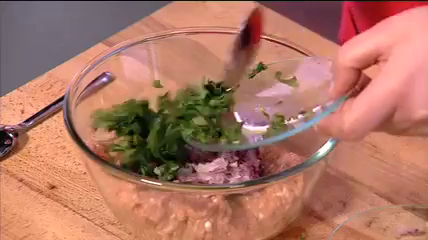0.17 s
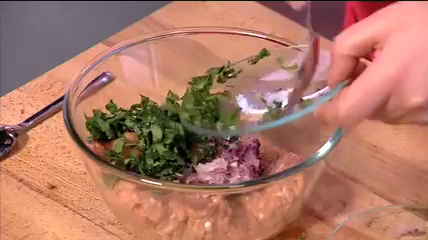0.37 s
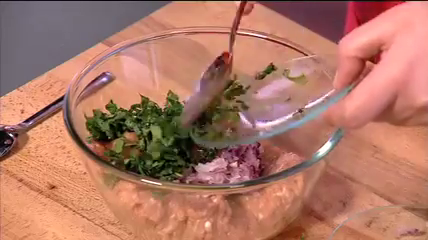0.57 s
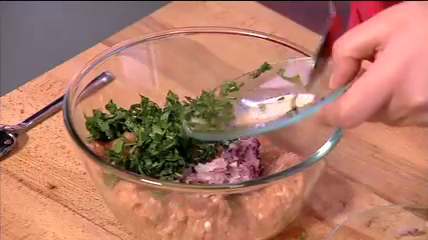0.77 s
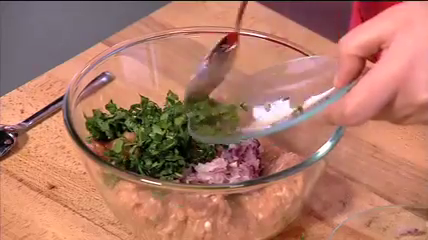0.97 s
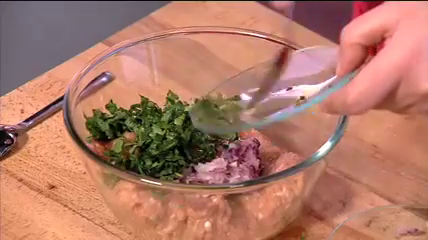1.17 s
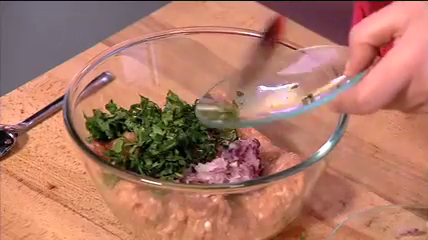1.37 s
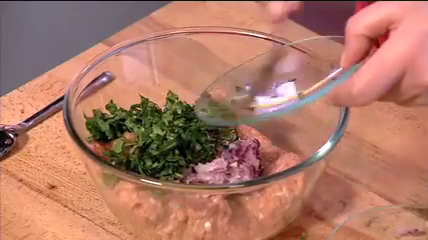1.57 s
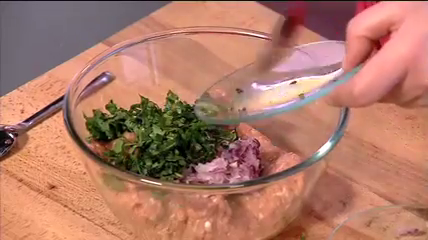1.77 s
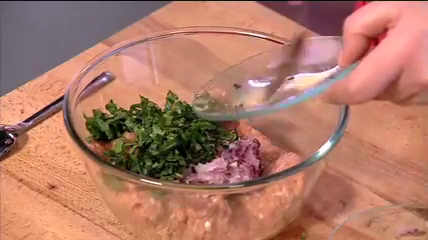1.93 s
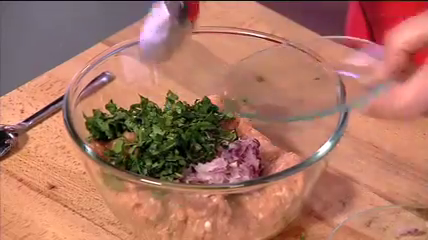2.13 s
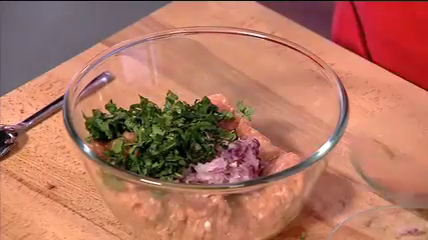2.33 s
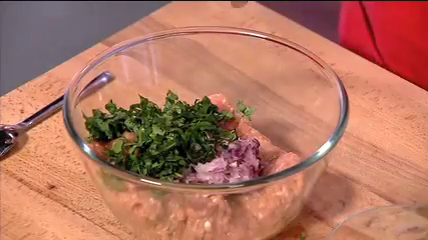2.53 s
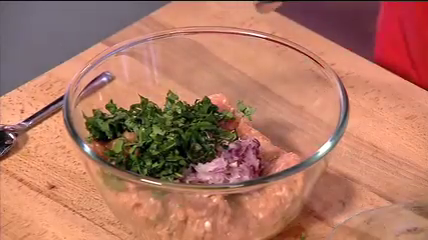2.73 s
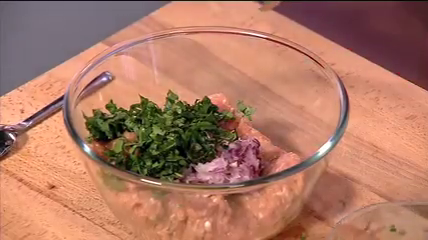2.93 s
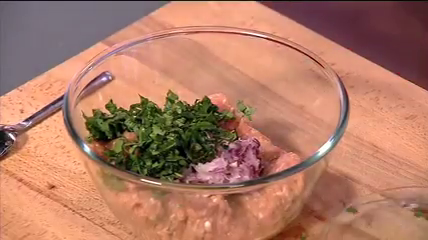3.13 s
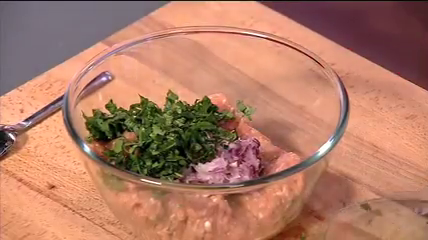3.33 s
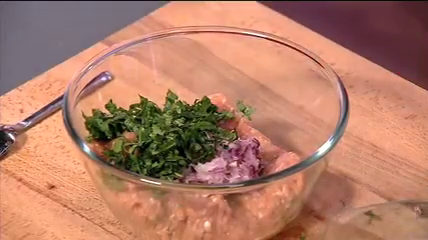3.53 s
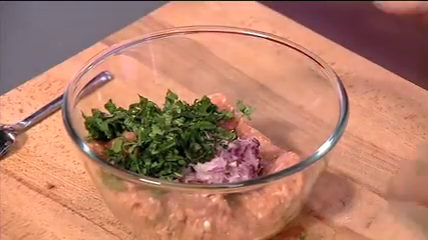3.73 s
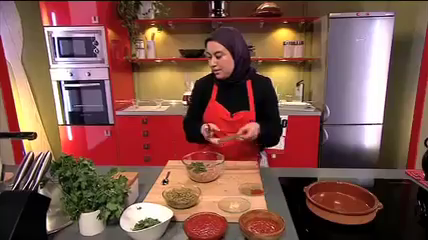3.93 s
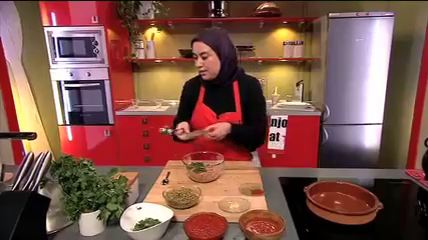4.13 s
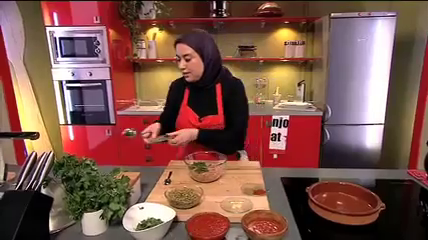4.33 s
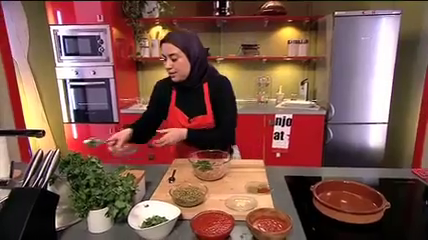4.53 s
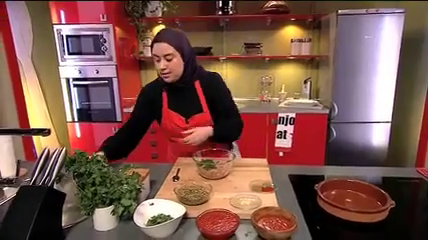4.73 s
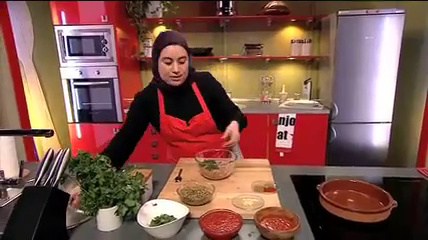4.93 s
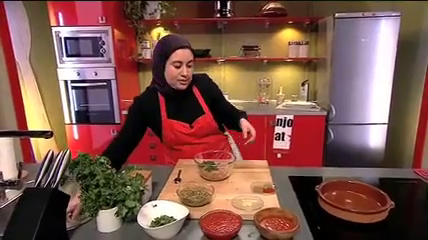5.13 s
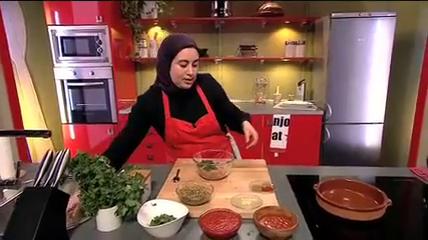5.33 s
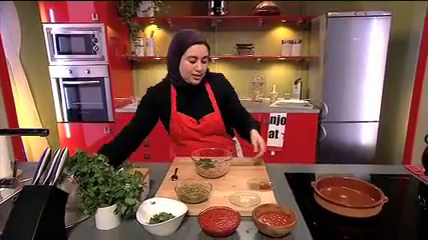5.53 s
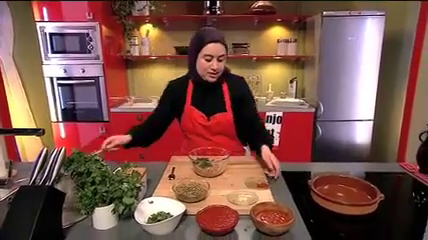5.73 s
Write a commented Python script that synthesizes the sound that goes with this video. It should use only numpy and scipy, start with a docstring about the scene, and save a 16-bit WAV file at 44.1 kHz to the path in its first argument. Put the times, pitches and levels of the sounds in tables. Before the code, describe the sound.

Sharp clinks and short scrapes of a spoon on glass, then rattling and a hollow thud as the dish is put down.

```python
"""A steel spoon taps and scrapes a small hand-held glass dish over a bowl, then rattles in the dish as it
is carried off. Each blow clicks, makes the glass ring and chatters away; each scrape is a run of tiny
catches and slips. The dish bumps something hollow, lands with a boom on a hollow counter and is shuffled
there. Behind it is a quiet kitchen with rustling sleeves and a thin whistle, heard through one close
microphone set left of centre."""
import sys
import numpy as np
from scipy import signal
from scipy.fft import rfft, irfft
from scipy.io import wavfile

SR = 44100
rng = np.random.default_rng(int(sys.argv[2]) if len(sys.argv) > 2 else 0)


def transcribe(signal):
    """Save signal, clipped to [-1, 1], as a 16-bit WAV file at the path in sys.argv[1]."""
    frames = np.atleast_2d(signal).T
    limited = np.clip(frames, -1, 1)
    pcm = np.round(limited * 32767).astype(np.int16)
    wavfile.write(sys.argv[1], SR, pcm)


N = 255496
TIME = np.arange(N) / SR


def undb(db):
    """Turn decibels into a number to multiply by."""
    return 10 ** (np.asarray(db) / 20)


def band(x, low_hz, high_hz):
    """Keep the sound between two pitches, with gentle edges."""
    edges_hz = [low_hz, min(high_hz, .45 * SR)]
    return signal.sosfilt(signal.butter(2, edges_hz, "band", fs=SR, output="sos"), x)


def unit(x):
    """Scale a sound to an average (rms) size of 1."""
    return x / np.sqrt(np.mean(x ** 2))


def noise(low_hz, high_hz):
    """Random noise between two pitches, at an average size of 1."""
    return unit(band(rng.standard_normal(N), low_hz, high_hz))


def shaped(x, points, share=1):
    """Turn pitches up or down along a curve of (pitch [Hz], level [dB]) points."""
    hz, db = np.transpose(points)
    pitches = np.maximum(np.fft.rfftfreq(N, 1 / SR), 1)
    return irfft(rfft(x) * undb(share * np.interp(np.log(pitches), np.log(hz), db)), N)


def mode(force, hz, ring_s):
    """One natural note of an object: each push starts it, and it fades by 60 dB in ring_s."""
    decay = np.exp(-np.log(1000) / (max(ring_s, 1e-3) * SR))
    turn = 2 * np.pi * hz / SR
    return signal.lfilter([0, decay * np.sin(turn)], [1, -2 * decay * np.cos(turn), decay ** 2], force)


def ticks(rows, rise, fade, per_s, scatter_db, count=700):
    """Surfaces catch and slip: tick positions and sizes per row of (time [s], level [dB], length [s])."""
    start_s, db, length_s = np.transpose(rows)[:, :, None]
    gap, strength, sign = np.moveaxis(rng.random((len(rows), count, 3)), 2, 0)
    t = np.cumsum(-np.log(1 - gap) / per_s, axis=1)
    progress = t / length_s
    pressure = np.minimum(progress / rise, 1) * np.clip(1 - progress, 0, 1) ** fade
    extra_db = scatter_db * np.minimum(-np.log(1 - strength), 2)
    size = undb(db + extra_db) * np.sign(sign - .5) * pressure
    return np.minimum(((start_s + t) * SR).astype(int), N - 1), size


# Where the three stages begin and end: dish held, carried off, resting on the counter (time [s])
STAGE_EDGES = [0, 2.5, 5.0, 6]
HELD, CARRIED, RESTING = 0, 1, 2


def during(rows, stage):
    """Pick the rows whose time falls in one stage."""
    rows = np.array(rows)
    return rows[(rows[:, 0] >= STAGE_EDGES[stage]) & (rows[:, 0] < STAGE_EDGES[stage + 1])]


# The tone colour of the quiet kitchen (pitch [Hz], relative level [dB])
HUSH_COLOUR = [(40, -33.5), (75, -13), (110, -1.5), (165, 3), (250, 1), (500, -6.5), (900, -16.5),
               (1500, -13.5), (4000, -18), (12000, -21), (16000, -34)]


def kitchen_hush():
    """The room's faint, steady, mostly low noise."""
    return undb(-68) * unit(shaped(rng.standard_normal(N), HUSH_COLOUR))


# Movements of sleeves and hands (time [s], length [s], level [dB], treble [dB])
SLEEVE_MOVES = [(2.319, 0.19, -70, -16), (2.653, 0.042, -54, -34), (2.696, 0.16, -61, -8),
                (3.456, 0.38, -65.5, -3.5), (4.085, 0.16, -61, -2.5), (4.466, 0.28, -65, 2),
                (4.723, .33, -68.5, 2)]


def sleeves():
    """Moving cloth rubs, making short swells of fluttering noise."""
    flutter = undb(1.5 * noise(8, 60))
    low, high = flutter * noise(250, 1760), flutter * noise(3000, 16300)
    rustle = 0
    for start_s, length_s, db, treble_db in SLEEVE_MOVES:
        swell = np.interp(TIME, start_s + length_s * np.array([0, .15, .7, 1]), [.034, .64, 1, .047])
        rustle += swell * undb(db) * (low + undb(treble_db) * high)
    return rustle


# How loud the thin whistle is (time [s], level [dB])
WHISTLE_LEVELS = [(0, -83), (3.4, -82), (3.6, -100)]


def whistle(hz=12755):
    """A very faint, high tone whose loudness wavers."""
    waver = 1 + .4 * noise(5, 60)
    level = undb(np.interp(TIME, *np.transpose(WHISTLE_LEVELS)))
    return level * waver * np.sin(2 * np.pi * hz * TIME)


def add_echoes(x, echo_db, ring_s, top_hz):
    """The walls answer a moment later with a blur of fading echoes."""
    t = np.arange(SR // 2) / SR
    build_up = np.clip(t / .006 - .6, 0, 1)
    tail = band(rng.standard_normal(len(t)), 150, top_hz) * 1000 ** (-t / ring_s) * build_up
    return x + undb(echo_db) * signal.fftconvolve(x, tail / np.sqrt(np.sum(tail ** 2)))[:N]


# The dish bumps something hollow (time [s], level [dB])
BUMP_HITS = [(3.0237, -13), (3.0637, -19)]
# The notes of that hollow thing (pitch [Hz], level [dB], ring time [s])
HOLLOW_NOTES = [(455, -5, .035), (740, 0, .018), (1285, -17, .3)]


def hollow_bumps(push_s=.0004):
    """Soft, rounded pushes make a hollow body ring."""
    start_s, db = np.transpose(BUMP_HITS)
    hits = np.bincount((start_s * SR).astype(int), undb(db), N)
    push = np.hanning(int(push_s * SR) + 2)
    force = np.convolve(hits, push / push.sum())[:N]
    ring = sum(undb(note_db) * mode(-force, hz, ring_s) for hz, note_db, ring_s in HOLLOW_NOTES)
    return band(ring, 230, SR)


# The low notes of the hollow counter (pitch [Hz])
COUNTER_PITCHES = [214, 267, 335, 399, 575, 650, 745, 850]
# How each of those notes rings (level [dB], ring time [s])
COUNTER_RINGS = [(-.7, .55), (-4.5, 0.12), (-9, .2), (-6.5, 0.12), (-5, 0.11), (-4, 0.082), (-15, 0.2),
                 (-14, 0.2)]


def counter_boom(blows, slides, landing_db=-3.5, loaded_ring_s=.055):
    """The landing makes the top boom; with the dish weighing on it, later knocks and slides only rumble."""
    start_s, blow_db = blows[:, :2].T
    boom_db = np.r_[landing_db, blow_db[1:] - 17]
    chatter = np.c_[start_s, boom_db - 13, 2 * chatter_s(blow_db, RESTING)]
    at, size = ticks(chatter, rise=.048, fade=.88, per_s=330, scatter_db=3)
    at[:, 0], size[:, 0] = start_s * SR, undb(boom_db)  # the first tick is the knock itself
    slide_at, slide_size = ticks(slides[:, :3], rise=.041, fade=.41, per_s=290, scatter_db=2.5)
    at, size = np.r_[at, slide_at].ravel(), np.r_[size, undb(6) * slide_size].ravel()
    landing, later = np.bincount(at[:1], size[:1], N), np.bincount(at[1:], size[1:], N)
    boom = sum(undb(db) * (mode(landing, hz, ring_s) + mode(later, hz, min(ring_s, loaded_ring_s)))
               for hz, (db, ring_s) in zip(COUNTER_PITCHES, COUNTER_RINGS))
    return undb(-6) * band(boom, 195, 6000)


# Every slide on the glass (time [s], tick level [dB], length [s], brightness [dB])
SCRAPES = [(.43, -55, .13, -3), (0.832, -47.5, 0.11, -2.5), (1.072, -52, 0.087, -3), (1.195, -44.5, .1, 3),
           (1.57, -48, 0.065, 3), (1.638, -46, 0.04, 9), (1.977, -46, 0.096, 2), (3.066, -17.5, 0.062, 5),
           (3.112, -25, 0.065, 3), (3.17, -34, .045, 2), (3.213, -21.5, 0.028, -4),
           (3.23, -19.5, 0.031, .1), (3.388, -46, 0.055, -3), (3.992, -48, 0.07, 18),
           (4.135, -37, 0.024, 8), (4.27, -41, 0.025, -5), (4.372, -50, 0.072, -4), (4.43, -45, 0.056, -3),
           (4.797, -45, 0.045, 6), (5.07, -28, 0.16, -10), (5.225, -40, 0.11, -2), (5.344, -29, 0.13, 12),
           (5.481, -37, 0.21, -13), (5.607, -33, 0.2, 14)]
# One value per stage: a plain slide's bass and treble, and what each dB of brightness adds to them
SCRAPE_BASS_DB, SCRAPE_TREBLE_DB = [-.5, -17, -14], [-2.5, -6, -11.5]
BASS_PER_DB, TREBLE_PER_DB = [-.3, -1.2, -1.4], [1.5, .7, .1]


def scrapes(stage, grit_db):
    """A dragging edge ticks and muffles the glass, so more of its sound is grit than ring."""
    rows = during(SCRAPES, stage)
    at, size = ticks(rows[:, :3], rise=.05, fade=.41, per_s=3000, scatter_db=3.8)
    bass_db = SCRAPE_BASS_DB[stage] + BASS_PER_DB[stage] * rows[:, 3]
    treble_db = SCRAPE_TREBLE_DB[stage] + TREBLE_PER_DB[stage] * rows[:, 3]
    return at, size, size * undb(grit_db), bass_db, treble_db


# Every blow on the dish (time [s], level [dB], bass [dB], treble [dB], chatter next to the blow [dB])
TAPS = [(0.4239, -1.5, -11, -5.5, -12.5), (0.4681, -26.5, -5, 1.5, -13), (0.5967, -45.5, -2, -7, -13),
        (0.824, -4, -7.5, 0.5, -17), (0.8324, -10, -7.5, -3.5, -8), (0.9201, -37, -9, 1.5, -9),
        (0.9702, -34.5, -3.5, -7.5, -12), (0.9902, -13.5, -6, -1.5, -17), (1.0552, -3, -10, -3, -17),
        (1.1766, -2, -9, 3, -23), (1.1844, -7, -9.5, -1, -6), (1.2725, -21, -7, 7, -16),
        (1.3142, -33.5, -1, -11, -15), (1.392, -6.5, -9.5, -4.5, -21), (1.5615, -4.5, -12, -4.5, -12),
        (1.6348, -20, -20, 6, -9), (1.9617, -2, -9.5, -3, -22), (1.9681, -10, -3.5, -6, -7),
        (2.0773, -13, -16, 3, -13), (2.8313, -12.5, -20, -12, -6.5), (2.8554, -36, -10, -20, 0),
        (2.902, -38, -3, -12, -3.5), (3.0125, -30, -26, -4.5, -9), (3.0637, -4.5, -13, 9, -14),
        (3.0736, -5.5, -30, -8, -13), (3.0813, -13.5, -30, 0, 1), (3.1348, -13.5, -10.5, -15, -2.5),
        (3.3322, -17, -11, -6.5, -4), (3.588, -40.5, -0.5, -2, -9), (3.8761, -47.5, -14, -7, -5.5),
        (4.1295, -27, -14, -9, -1), (4.2013, -19, -11, -7.5, -9), (4.3075, -36.5, -5.5, -12, 0),
        (4.3255, -11, -36, -5, -4), (4.3463, -22, -25, -22, -3), (4.3565, -21, -16.5, -2, -2),
        (4.3625, -14, -20, -5, -8), (4.5813, -37, -22, -13, -16.5), (5.0648, -4.5, -6, -10, -9),
        (5.2158, -29.5, 4, -11.5, -8), (5.322, -13, -30, -8, -1), (5.3318, -7, -40, -8, -7),
        (5.437, -18, -12, -12, -3), (5.469, -11, -30, -10.5, -6), (5.512, -17.5, -25, -16, 0),
        (5.5795, -17, -33, -10, 0), (5.5957, -5, -40, -9, -8), (5.688, -28, -31, -20, 0),
        (5.752, -34, -8, -15.5, -10)]
# One value per stage: how long a full blow chatters, and the extra time for each dB softer
CHATTER_S, CHATTER_S_PER_DB = [.021, .013, .034], [.0003, .0001, .0008]


def taps(stage, rise, crack_db):
    """A clean blow cracks, then the spoon chatters in a dying run of ticks."""
    start_s, db, bass_db, treble_db, chatter_db = during(TAPS, stage).T
    chatter = np.c_[start_s, db + chatter_db, chatter_s(db, stage)]
    at, size = ticks(chatter, rise, fade=1.6, per_s=4200, scatter_db=2.5)
    at[:, 0], size[:, 0] = start_s * SR, undb(db)  # the first tick is the blow itself
    click_size = size.copy()
    click_size[:, 0] *= undb(crack_db + .3 * db)  # a lighter blow cracks less
    return at, size, click_size, bass_db, treble_db


def chatter_s(blow_db, stage):
    """How long the spoon chatters: longer after a softer blow."""
    return CHATTER_S[stage] - CHATTER_S_PER_DB[stage] * blow_db


# The spot the spoon touches favours some groups of notes; each row holds until the next
# (time [s], first group [dB], second group [dB], third group [dB])
TOUCH_SPOTS = [(0, -10, 3, 3), (.8, -3, 3, 2), (.96, 0, -2, -2), (1.04, 4, 0, -1), (1.16, 3, -12, -12),
               (1.37, 2, -3, -3), (1.54, -12, 3, -8), (1.94, -6, -12, -12), (2.06, 0, 3, -5),
               (2.5, 0, 0, -3), (3.5, -12, 4, -2), (4.26, -5, -2, 4)]
# The notes in those groups, one row per stage (first group [Hz], second group [Hz], third group [Hz])
NOTE_GROUPS = [([3418, 5040, 11830], [1475, 8600, 14510], [5675]), ([1985, 2930, 5090], [790, 2262, 5910],
               [790, 3700, 4430, 6700]), ([], [], [])]


def spot_levels(stage, start_s, pitches, spread_db, choked_until_s=5.2):
    """Each touch meets a new spot on the glass, so each note comes out louder or softer."""
    levels_db = spread_db * rng.standard_normal((len(start_s), len(pitches)))
    spots = np.array(TOUCH_SPOTS)
    groups_db = spots[np.searchsorted(spots[:, 0], start_s) - 1, 1:]
    for group, db in zip(NOTE_GROUPS[stage], groups_db.T):
        for hz in group:
            levels_db[:, np.argmin(abs(pitches - hz))] += db
    landing_flat = (start_s > STAGE_EDGES[RESTING]) & (start_s < choked_until_s)
    levels_db[landing_flat] -= 15  # landing flat chokes the ring
    return levels_db


def glass(stage, touches, notes, tone_hz, low_hz, ring_db, click_db, spread_db):
    """Ticks ring the glass and also click straight into the air; tone_hz marks out bass, middle, treble."""
    at, size, click_size, bass_db, treble_db = map(np.concatenate, zip(*touches))

    def force(sizes, db):
        """Lay the ticks out in time, with one level for each touch."""
        return np.bincount(at.ravel(), (sizes * undb(db)[:, None]).ravel(), N)

    spots_db = spot_levels(stage, at[:, 0] / SR, notes[:, 0], spread_db)
    directions = rng.choice([-1, 1], spots_db.shape)  # the spot also sets which way a note is pushed
    ring = 0
    for (hz, db, ring_s), spot_db, direction in zip(notes, spots_db.T, directions.T):
        bass_share = np.interp(np.log(hz), np.log(tone_hz), [1, .024, .00032, .027])
        treble_share = np.interp(np.log(hz), np.log(tone_hz), [.12, .0026, .014, 1])
        note_db = db + spot_db + bass_share * bass_db + treble_share * treble_db
        ring += mode(force(size * direction[:, None], note_db), hz, ring_s)
    edges_hz = [low_hz, tone_hz[1], tone_hz[2], 17000]
    click = 0
    for k, colour_db in enumerate([bass_db, np.zeros_like(bass_db), treble_db]):
        click += undb(click_db[k]) * band(force(click_size, colour_db), edges_hz[k], edges_hz[k + 1])
    return band(undb(ring_db) * ring + click, low_hz / 1.5, SR)  # the deepest bass is cut away


def notes_from_peaks(peaks):
    """A narrower peak starts softer and rings longer: gives (pitch [Hz], level [dB], ring time [s])."""
    hz, width_hz, db = np.transpose(peaks)
    return np.c_[hz, db + 20 * np.log10(width_hz / width_hz.max()), np.log(1000) / (np.pi * width_hz)]


# The notes of the dish on the counter (pitch [Hz], peak width [Hz], peak level [dB])
RESTING_PEAKS = [(1859, 100, 4), (1990, 70, 2), (2240, 150, -5), (3370, 90, -6), (3680, 200, -4),
                 (5120, 160, -6.5), (5670, 150, -5), (6760, 190, -7), (7890, 580, -9), (8600, 99, -3.5),
                 (9320, 210, 2), (10240, 133, -1), (11800, 240, -5.5), (14250, 100, -6)]


def resting_dish():
    """The dish lands, then clinks and scrapes as it is shuffled on the counter."""
    touches = taps(RESTING, rise=.04, crack_db=11), scrapes(RESTING, grit_db=5.5)
    return glass(RESTING, touches, notes_from_peaks(RESTING_PEAKS), tone_hz=[900, 1150, 6000, 10000],
                 low_hz=493, ring_db=-5, click_db=[11, 2.5, 5], spread_db=3.5)


# The notes of the dish with the spoon lying in it (pitch [Hz], peak width [Hz], peak level [dB])
CARRIED_PEAKS = [(790, 100, 6), (1320, 40, 6), (1985, 107, 4), (2085, 55, 4), (2262, 69, -3.5),
                 (2930, 49, -4), (3720, 190, -3), (4430, 270, -11), (5090, 87, -4), (5910, 250, -5),
                 (6700, 70, -6), (7620, 300, -1), (8664, 40, 1), (10130, 45, 2), (10705, 45, -1),
                 (14175, 45, -2), (14840, 60, -5)]


def carried_dish():
    """The loose spoon rattles and slides in the moving dish."""
    touches = taps(CARRIED, rise=.067, crack_db=14), scrapes(CARRIED, grit_db=3)
    return glass(CARRIED, touches, notes_from_peaks(CARRIED_PEAKS), tone_hz=[1350, 1840, 6040, 10000],
                 low_hz=390, ring_db=-8, click_db=[12, 1.5, 1.5], spread_db=3.5)


# The notes of the dish in the hand, one list each for (pitch [Hz]), (level [dB]) and (ring time [s])
HELD_PITCHES = [1050, 1475, 3290, 3418, 5040, 5675, 6190, 6934, 7015, 4720, 7924, 8600, 9550, 10350, 11830,
                12080, 13940, 14510]
HELD_LEVELS = [-3.5, -8.5, -14, -15, -13, -12, -10, -15, -7, -12, -8, -6, -6.5, -4, -1.5, -6, -12, -8.5]
HELD_RING_TIMES = [.028, .04, .025, .025, .045, .055, .022, .05, .035, .022, .022, .05, .02, .035, .045,
                   .018, .025, .045]


def held_dish():
    """The spoon taps and scrapes the glass while fingers cut its ringing short."""
    touches = taps(HELD, rise=.1, crack_db=15.5), scrapes(HELD, grit_db=9)
    notes = np.c_[HELD_PITCHES, HELD_LEVELS, HELD_RING_TIMES]
    return glass(HELD, touches, notes, tone_hz=[1400, 1750, 8600, 11000],
                 low_hz=650, ring_db=-11.7, click_db=[11, -1.5, .6], spread_db=1.75)


# How much louder the left side is than the right (pitch [Hz], left minus right [dB])
LEFT_LEAN = [(200, 3), (2400, 1.88), (15000, 1.37)]


def scene():
    """Put the dish and the counter in the kitchen, leaning a little to the left."""
    dish = held_dish() + carried_dish() + resting_dish()
    thuds = hollow_bumps() + counter_boom(during(TAPS, RESTING), during(SCRAPES, RESTING))
    mix = add_echoes(dish + thuds, echo_db=-20.1, ring_s=.27, top_hz=11800)
    mix += kitchen_hush() + sleeves() + whistle()
    return np.array([shaped(mix, LEFT_LEAN, side / 2) for side in (1, -1)])


def record(dry, top_hz=15900):
    """Flatten peaks that pass full scale, then cut the highest treble."""
    treble_cut = signal.ellip(10, .2, 70, top_hz, fs=SR, output="sos")
    return signal.sosfilt(treble_cut, np.clip(dry, -1, 1))


dry = scene()
out = record(dry)
transcribe(out)
```